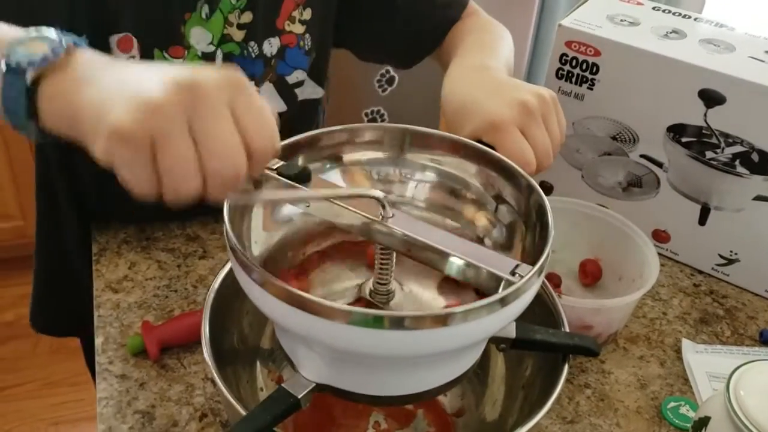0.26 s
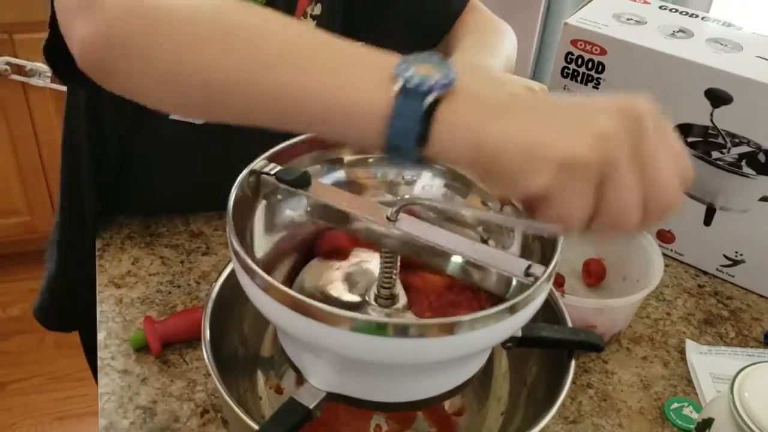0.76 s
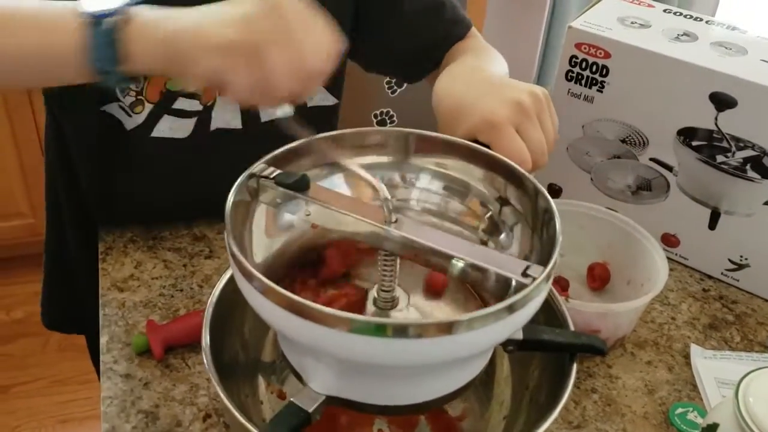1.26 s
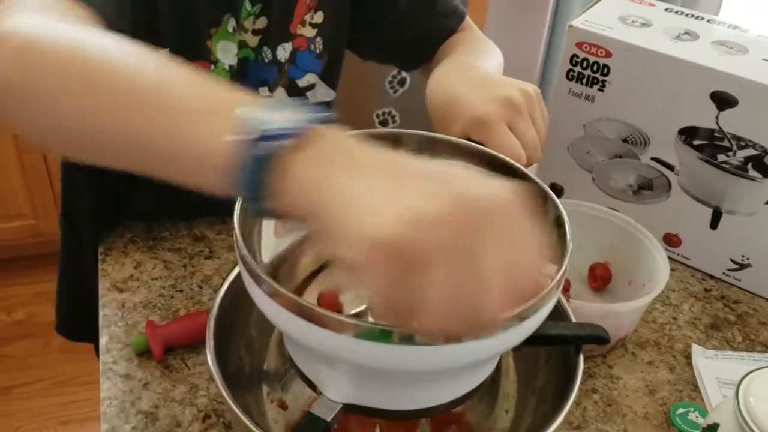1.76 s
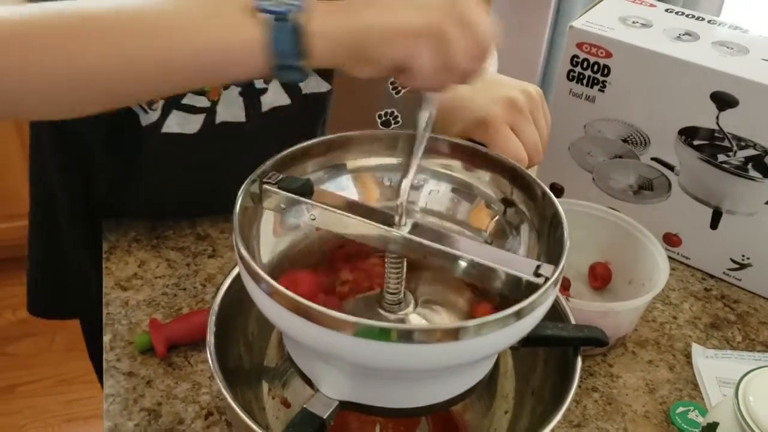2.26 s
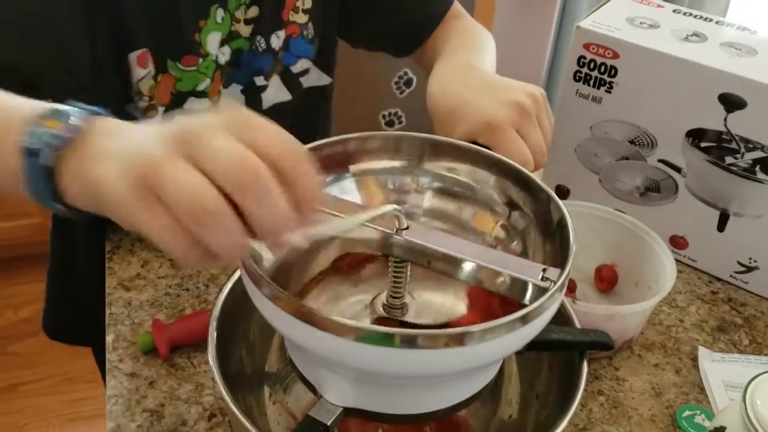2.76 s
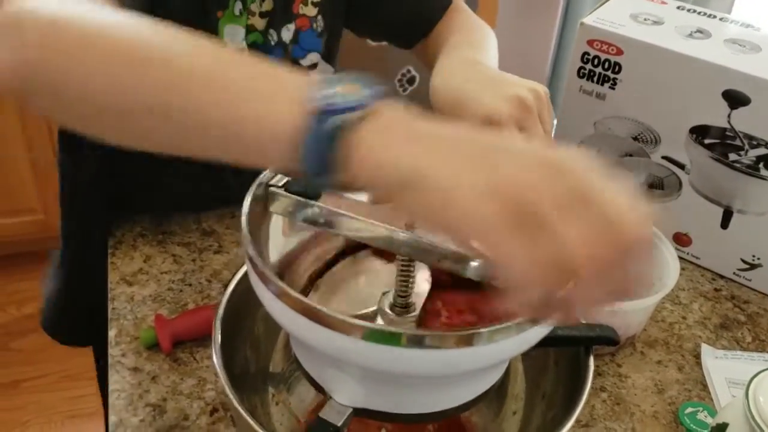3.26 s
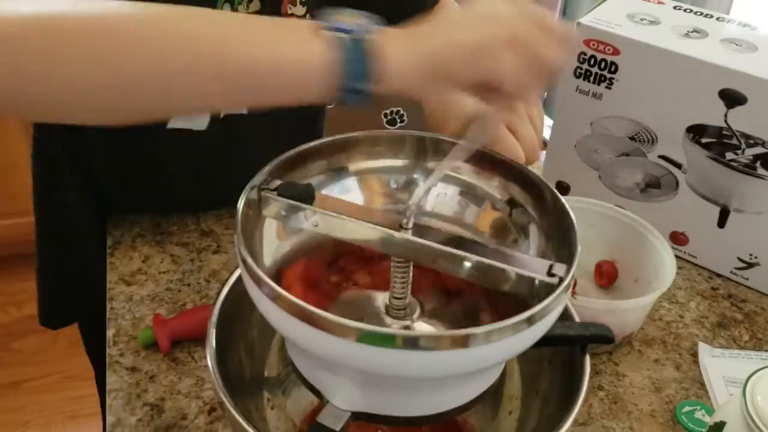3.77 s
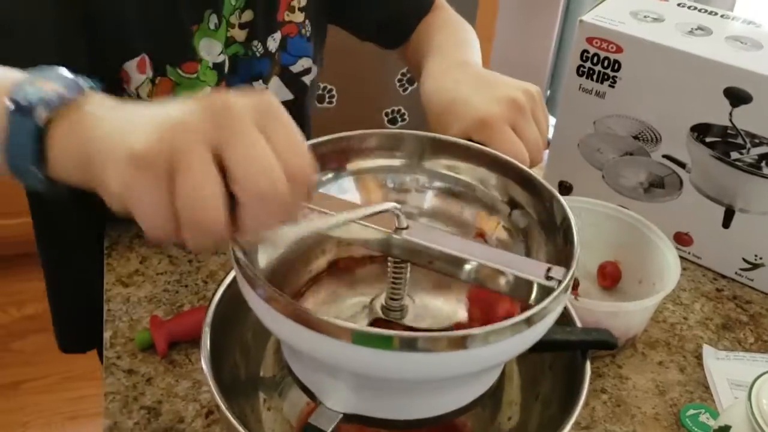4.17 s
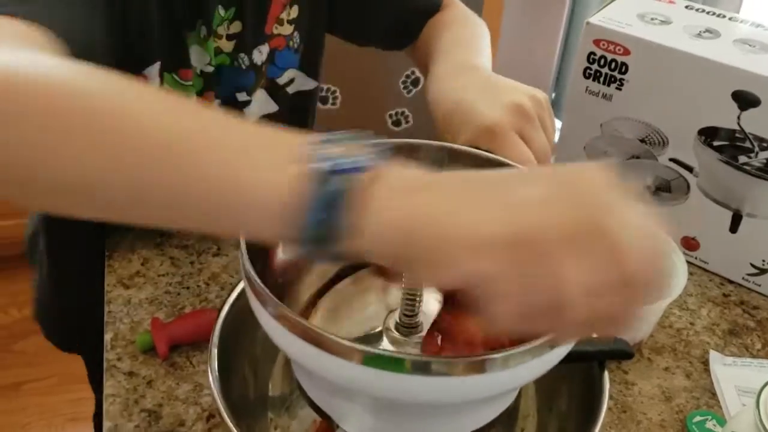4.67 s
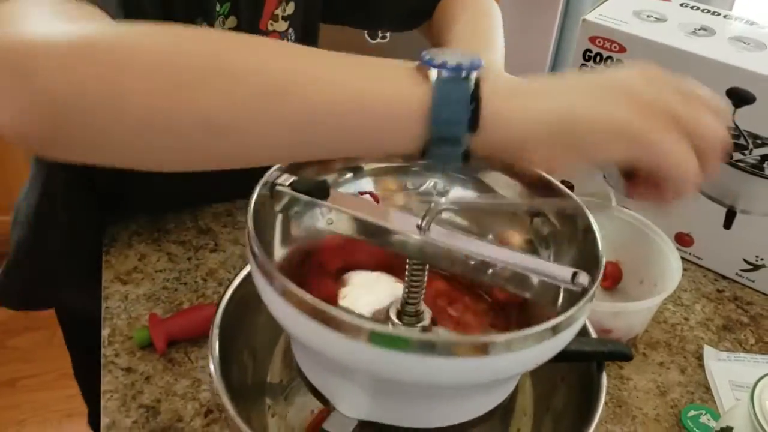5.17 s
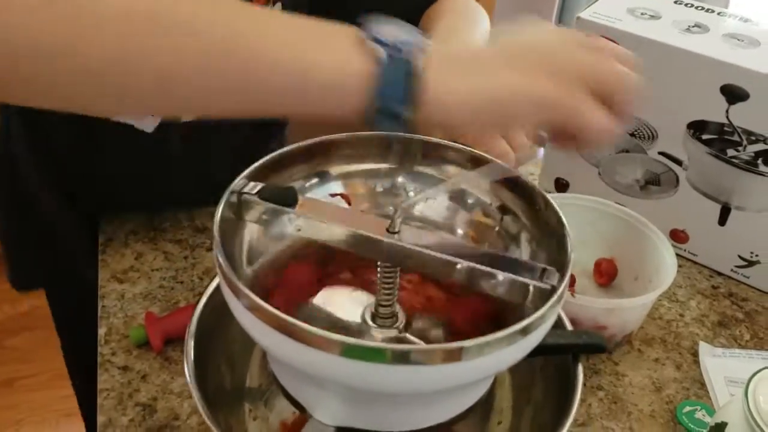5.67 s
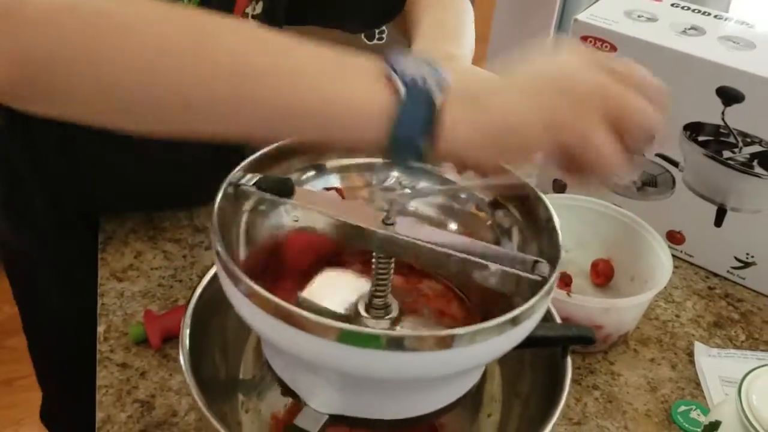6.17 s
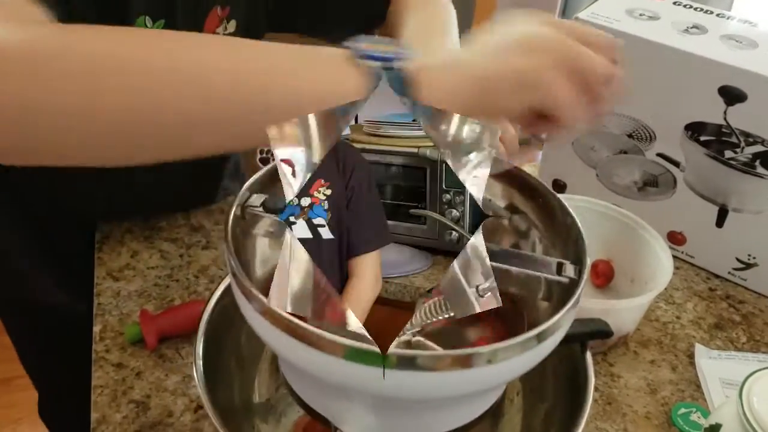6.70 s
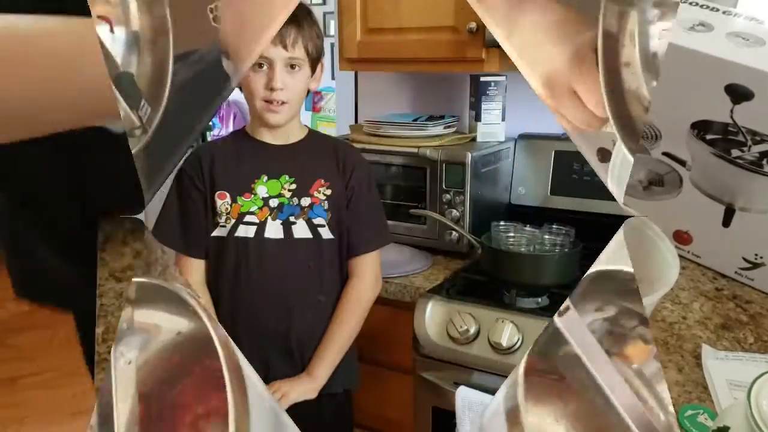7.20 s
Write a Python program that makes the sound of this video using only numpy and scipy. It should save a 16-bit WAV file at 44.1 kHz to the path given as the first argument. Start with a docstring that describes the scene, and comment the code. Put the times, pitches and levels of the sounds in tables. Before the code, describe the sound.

Close in a home kitchen, a hand-cranked steel mill turns on a mixing bowl. The blade scrapes grittily round a perforated disc with scattered metallic clicks and loose rattles. From about four seconds, clanks and hollow bowl knocks become denser and louder. Low room rumble and a faint high whine lie beneath. Just after seven seconds everything stops briefly, then a quieter room remains.

```python
"""In a kitchen, a hand-cranked steel food mill turns on a mixing bowl, close by.
The blade scrapes round a perforated disc (slip noise through mill and bowl modes) and snags with clicks
(snap, ringing modes, loose rattle). The mill knocks on the bowl (sagging sines, counter boom, noise).
Beneath lie coloured room tone, a swelling low rumble and a thin high whine with fast amplitude throb.
Near the end everything drops to a short silence, then a quieter room follows."""
import sys
import numpy as np
from scipy import signal
from scipy.fft import rfft, irfft
from scipy.io import wavfile
from scipy.ndimage import uniform_filter1d

SR = 44100
rng = np.random.default_rng(int(sys.argv[2]) if len(sys.argv) > 2 else 0)


def output_pcm(signal):
    """Save a mono or channel-first signal as 16-bit PCM at the path in sys.argv[1].

    Samples are clipped to [-1, 1] before scaling.
    """
    pcm = np.clip(np.atleast_2d(signal).T, -1, 1) * 32767
    wavfile.write(sys.argv[1], SR, np.round(pcm).astype(np.int16))


N = 328104

# modes of the mill: (frequency [Hz], width [Hz], relative level [dB])
MILL_MODES = [(1046, 95, -12), (1407, 130, -2), (1715, 40, -18), (2100, 88, -18), (2580, 133, -17),
              (3048, 81, -17.5), (4000, 105, -7), (4384, 94, -1.5), (5080, 440, -2), (5800, 470, -4.5),
              (6490, 100, 3), (7030, 700, 3), (11730, 860, -1.5), (14300, 600, -15.5)]
# modes of the bowl: (frequency [Hz], width [Hz], relative level [dB])
BOWL_MODES = [(128, 13, -4.5), (325, 200, -12), (455.3, 110, 0.5), (689.5, 26, 2.5)]
# bands of a snag, in the order mid, low, upper, top: (low edge [Hz], high edge [Hz])
SNAG_BANDS_HZ = [(1500, 4000), (600, 1500), (4000, 8000), (8000, 16500)]


def gain_of(db):
    """dB to amplitude gain."""
    return 10 ** (np.asarray(db) / 20)


def evened(x):
    """Scales to rms 1."""
    return x / np.sqrt(np.mean(x ** 2) + 1e-20)


def spectrum_at(points, hz):
    """Interpolates a spectrum on a log-frequency axis."""
    f, value = np.transpose(points)
    return np.interp(np.log(hz + 1), np.log(f + 1), value)


def curve(points):
    """Interpolates (time [s], value) points sample by sample."""
    s, value = np.transpose(points)
    return np.interp(np.arange(N) / SR, s, value)


def add(mix, s, sound):
    """Mixes a sound in at time s, cut at the end of the mix."""
    part = mix[:, round(s * SR):][:, :sound.shape[1]]
    part += sound[:, :part.shape[1]]


def band(x, lo_hz, hi_hz):
    """Butterworth band-pass."""
    sos = signal.butter(2, [lo_hz, hi_hz], "bandpass", fs=SR, output="sos")
    return signal.sosfilt(sos, x)


def ring(x, modes, dry):
    """Excites parallel two-pole resonators with x and adds a share of x unfiltered."""
    out = dry * x
    for hz, width_hz, db in modes:
        r = np.exp(-np.pi * width_hz / SR)
        b = [1 - r * r, 0, r * r - 1]
        a = [2, -4 * r * np.cos(2 * np.pi * hz / SR), 2 * r * r]
        out = out + 2 * gain_of(db) * signal.lfilter(b, a, x)
    return out


def stereo(spectrum, sources):
    """Blends two sources into left and right by likeness per frequency; channel mean has rms 1."""
    # (frequency [Hz], left-right likeness [0-1])
    likeness = [(60, 0.76), (180, 0.96), (550, 0.74), (1650, 0.035), (4970, 0.017), (15000, 0.071)]
    # (frequency [Hz], left over right [dB])
    tilt = [(60, 1), (150, 2.0), (380, 2), (950, 4), (2380, 3.5), (5980, 0), (15000, 3.5)]
    hz = np.fft.rfftfreq(N, 1 / SR)
    same = np.clip(spectrum_at(likeness, hz), -1, 1)
    lean = gain_of(spectrum_at(tilt, hz) / 2)
    a, b = rfft(sources)
    left = a * lean
    right = (same * a + np.sqrt(1 - same ** 2) * b) / lean
    out = irfft(np.array([left, right]) * gain_of(spectrum_at(spectrum, hz)), N)
    return out / np.sqrt(np.mean(out.mean(0) ** 2))


def grit(slips_per_s, spread_db, hiss, patchy_db):
    """Random tiny slips over a steady hiss, wandering in loudness by patches of pitch and time."""
    happens = rng.random(N) < slips_per_s / SR
    size = gain_of(spread_db * np.minimum(rng.exponential(1, N), 4)) * happens
    slips = signal.oaconvolve(size, np.exp(-np.arange(1500) / 110.0))[:N]
    noise = (hiss + evened(slips)) * rng.standard_normal((2, N))
    z = signal.stft(noise, nperseg=256, noverlap=192)[2]
    patches = uniform_filter1d(rng.standard_normal(z.shape[1:]), size=7, axis=0)  # across pitch
    patches = uniform_filter1d(patches, size=16, axis=1)  # across time
    swell = uniform_filter1d(rng.standard_normal(z.shape[2]), size=40)
    z = z * gain_of(patchy_db * evened(patches) + 2.95 * evened(swell))
    return signal.istft(z, nperseg=256, noverlap=192)[1][:, :N]


def quieter_room():
    """Steady coloured noise of the room after the silence."""
    # (frequency [Hz], relative level per Hz [dB])
    colour = [(30, -24), (60, 5.5), (160, -15), (550, -12), (1000, -15.5), (8000, -21.5), (15000, -22.5)]
    return gain_of(-52.5) * stereo(colour, rng.standard_normal((2, N)))


def room_tone():
    """Steady coloured noise beneath the mill."""
    # (frequency [Hz], relative level per Hz [dB])
    colour = [(20, -34.5), (40, -12), (50, -2), (75, 1), (125, -0.5), (300, -4.5), (480, -14.5),
              (650, -11.5), (1390, -19), (1950, -26.5), (2500, -15.5), (3500, -27), (7200, -25),
              (8400, -31), (12000, -25.5), (13500, -29.5), (15300, -12)]
    return gain_of(-52) * stereo(colour, rng.standard_normal((2, N)))


def rumble():
    """Low narrow-band noise, mostly common to both channels, that swells."""
    # (time [s], level [dB])
    swell = [(0, -60), (.7, -53.5), (2.2, -60.5), (3.2, -51.5), (4.6, -63), (5.2, -48.5), (5.8, -60.5),
             (7.2, -51)]
    noise = rng.standard_normal(N) + 0.17 * rng.standard_normal((2, N))
    low = band(band(noise, 44.2, 61.0), 40, 58.3)
    return evened(low) * gain_of(curve(swell))


def whine():
    """A high sine whose pitch wavers slightly and whose amplitude throbs fast."""
    # (time [s], level offset [dB])
    fade = [(0, -2), (5.0, -5), (6.4, -5.5), (7.1, -4)]
    whine_hz, throb_hz, base_db, throb_depth = 15122, 401, -62.5, 1.3
    t = np.arange(N) / SR
    waver = np.cumsum(evened(uniform_filter1d(rng.standard_normal(N), size=6000))) / SR
    tone = np.sqrt(2) * np.sin(2 * np.pi * (whine_hz * t + 1.3 * waver))
    throb = 1 + throb_depth * np.cos(2 * np.pi * (throb_hz * t + 1.4 * waver))
    return gain_of(base_db + curve(fade)) * tone * throb * gain_of([[2.5], [-3.5]])


def knocks():
    """Pushes rock the bowl at a sagging pitch; thumpier ones start faster and boom through the counter."""
    # mill on bowl: (time [s], strength before the bowl modes [dB], starting pitch [Hz], thump share [0-1])
    hits = [(1.088, -41, 375, 0.7), (1.359, -32, 284, 0.74), (2.761, -36.5, 438, 0.36),
            (3.427, -30.5, 486, 0.38), (3.64, -29.5, 519, 0.26), (4.115, -34, 480, 0.03),
            (4.14, -31.5, 509, 0.2), (4.387, -28.5, 297, 0.88), (4.609, -35.5, 525, 0.5),
            (4.779, -39.5, 483, 0.53), (4.804, -25.5, 502, 0.06), (5.059, -20.5, 93, 0.45),
            (5.081, -24.5, 99, 0), (5.216, -15.5, 590, 0.32), (5.238, -31.5, 415, 0.7),
            (5.253, -16.5, 182, 0.63), (5.4, -30.5, 466, 0.53), (5.758, -30, 176, 0.43),
            (5.944, -29, 470, 0.34), (6.005, -36.5, 296, 1), (6.28, -27.5, 290, 1), (6.374, -19, 624, 0.32),
            (6.658, -29.5, 524, 0.04), (7.023, -32, 600, 0.3), (7.089, -41.5, 126, 0.75)]
    # bowl on the counter: (frequency [Hz], relative level [dB], T60 [s])
    counter_modes = [(68, 4.5, 0.35), (98, -4.5, 0.28), (144, 0.5, 0.23), (201.6, 4, 0.18),
                     (312.6, 5, 0.13)]
    base_t60_s = 0.061  # at 500 Hz and -30 dB
    pitch_power = 0.56  # lower knocks last longer
    damping = 0.27  # harder knocks die sooner: dB of ring time per dB of blow
    out, t = np.zeros((2, N)), np.arange(9000) / SR
    boom = sum(gain_of(db - 60 * t / t60_s) * np.sin(2 * np.pi * hz * t) for hz, db, t60_s in counter_modes)
    noises = rng.standard_normal((len(hits), len(t)))
    for (s, db, hz, thump), noise in zip(hits, noises):
        rise_s = 0.0021 + 0.0011 * max(1 - thump, 0)
        rise = 1 - np.exp(-(t / rise_s) ** 2)
        t60_s = base_t60_s * (500 / hz) ** pitch_power * gain_of(-damping * (db + 30))
        fade = gain_of(-60 * t / t60_s)
        rock = np.sin(2 * np.pi * hz * t * (1 - 1.17 * t)) * fade
        shake = evened(band(noise, 74, 464)) * np.sqrt(fade)
        knock = rise * (rock + thump * (0.31 * boom + 0.5 * shake))
        add(out, s, gain_of(db) * knock * gain_of([[1.2], [-1.2]]))
    return ring(out, BOWL_MODES, 0.63)


def struck(spot_hz, chance):
    """Mill modes as one blow wakes them: strongest near the struck part, with random spread."""
    hz, width_hz, db = np.transpose(MILL_MODES)
    return np.transpose([hz, width_hz, db - 15 * abs(np.log2(hz / spot_hz)) + 2.5 * chance])


def clank(t, modes):
    """Sum of decaying mode sines, scaled to peak 1."""
    hz, width_hz, db = modes.T[:, :, None]
    out = (gain_of(db) * np.exp(-np.pi * width_hz * t) * np.sin(2 * np.pi * hz * t)).sum(0)
    return out / abs(out).max()


def band_levels(clank_db, spot_hz, edge_db):
    """Snag level per band: the clank fades away from the struck part, the edge fills the treble."""
    fall_db_per_oct, dull_db_per_oct = 8, 15.5  # the clank fades faster into the treble
    mid, low, upper = [abs(np.log2(np.sqrt(lo * hi) / spot_hz)) for lo, hi in SNAG_BANDS_HZ[:3]]  # octaves
    upper_gain = np.hypot(gain_of(clank_db - dull_db_per_oct * upper), gain_of(edge_db - 1.13))
    return (clank_db - fall_db_per_oct * mid, clank_db - 1.5 - fall_db_per_oct * low,
            20 * np.log10(upper_gain), edge_db + 0.4)


def clicks():
    """Blade snags: each a snap, a ringing clank and a loose rattle, the snap and clank later at right."""
    # (time [s], clank peak [dB], part struck hardest [Hz], bright-edge peak [dB], rattle re snap [dB])
    snags = [(0.1762, -25, 2600, -27.5, -12.5), (0.6589, -39.5, 2400, -45, -18),
             (0.7649, -26, 1360, -38, -17), (0.9013, -26.5, 1410, -52, -15),
             (1.0621, -27.5, 1350, -34.5, -8), (1.0929, -17.5, 1330, -46, -14),
             (1.208, -41, 5530, -45, -10.5), (1.2444, -27.5, 3540, -42, -13.5),
             (1.3156, -34.5, 5750, -39, -5), (1.388, -34.5, 1010, -50, -15), (1.429, -32, 1030, -50, -17),
             (1.5682, -35, 1050, -39, -17), (1.7218, -38, 5260, -44, -8.5), (1.7802, -21, 1470, -64, -14.5),
             (1.8821, -21.5, 1400, -29, -12), (1.8983, -18.5, 1470, -43, -14),
             (2.2239, -34, 1200, -55, -10), (2.3034, -27.5, 2360, -35.5, -16.5),
             (2.754, -24.5, 1370, -54, -7.5), (2.7636, -23, 2070, -33.5, -17.5),
             (2.9659, -21, 2830, -40, -21.5), (3.115, -25.5, 1220, -39, -14.5),
             (3.3957, -33, 2130, -28.5, -13), (3.412, -14.5, 4240, -20.5, -14.5),
             (3.43, -22, 2020, -30, -14.5), (3.6291, -34.5, 1250, -57, -2.5),
             (3.9566, -19.5, 2900, -33, -22), (4.0317, -33, 2590, -50, -21), (4.114, -26, 3640, -36, -7),
             (4.12, -13, 4600, -17, -17.5), (4.1408, -11.5, 1780, -44, -22),
             (4.1658, -21.5, 1710, -31, -21), (4.3169, -11, 3220, -25.5, -21), (4.348, -35, 2710, -31, -19),
             (4.3965, -27, 2670, -36, -15.5), (4.4766, -28, 1530, -47, -11.5),
             (4.7877, -18.5, 1300, -24, -10.5), (4.798, -15, 1120, -46, -14),
             (4.8109, -5.5, 1370, -14.5, -16), (4.824, -17, 1040, -32.5, -20), (5.018, -29, 3900, -42, -15),
             (5.036, -40, 2480, -37.5, -7), (5.0505, -30, 1880, -49.5, 1), (5.163, -26, 1090, -53, -38),
             (5.217, -16.5, 1100, -27, -17), (5.3196, -24, 1630, -26, -12), (5.3273, -18, 970, -37, -20),
             (5.348, -26, 1040, -50, -30), (5.3886, -20, 4550, -23, -12.5),
             (5.4013, -9.5, 1410, -27, -14.5), (5.4184, -20.5, 902, -38, -12),
             (5.4306, -19.5, 1140, -47, -34), (5.5518, -25.5, 5900, -33, -32),
             (5.5583, -29.5, 2620, -30, -15.5), (5.614, -27, 902, -46, -6.5),
             (5.6252, -9.5, 1070, -36, -16), (5.6476, -23.5, 1080, -24, -22),
             (5.8644, -25, 2820, -33, -17.5), (5.915, -22, 1110, -53, -16),
             (5.9455, -10.5, 1250, -19.5, -15), (6.0328, -29.5, 2180, -32, -15),
             (6.0498, -23, 1090, -47, -21), (6.1308, -34, 3830, -33, -10), (6.17, -34, 1010, -25.5, -23),
             (6.2577, -26, 3100, -45.5, -7), (6.27, -33.5, 4300, -42, -17), (6.2988, -30, 2570, -43, -20),
             (6.3737, -18.5, 1900, -17, -11.5), (6.3868, -13, 1080, -16.5, -16.5),
             (6.537, -7.5, 4300, -16.5, -17), (6.6626, -37, 974, -36.5, -10.5), (6.716, -31, 4300, -48, -7),
             (6.7444, -30.5, 3800, -47, -5), (6.788, -31.5, 4400, -36.5, -10), (6.814, -38, 4400, -38, -10),
             (6.875, -35, 6000, -44, -7.5), (7.0109, -23, 1300, -31, -8.5),
             (7.0304, -21.5, 1020, -22.5, -17.5), (7.1034, -39, 2330, -37, -6)]
    # one value per band: snap T60 [s]
    snap_t60_s = [0.0061, 0.017, 0.0098, 0.01]
    # one value per band: rattle T60 [s]
    rattle_t60_s = [0.16, 0.12, 0.16, 0.12]
    # one value per band: delay of the right channel [samples]
    right_lag_samples = [3, 1, 9, 9]
    # one value per band: rattle mixed across from the other channel [ratio]
    rattle_cross = [0.012, 0.29, 0.28, 0.011]
    # one value per band: left over right [dB]
    left_over_right_db = [8, 4.5, 2, 5.5]
    out, t = np.zeros((2, N)), np.arange(6000) / SR
    noises = rng.standard_normal((len(snags), 3, len(t)))
    rise = 1 - np.exp(-(t / 0.0007) ** 2)  # the blade gives way over a millisecond or two
    for (s, clank_db, spot_hz, edge_db, loose_db), (snap, left, right) in zip(snags, noises):
        modes = struck(spot_hz, snap[-len(MILL_MODES):])
        blow = clank(t, modes)
        bounces = gain_of(1.53 * evened(uniform_filter1d(snap[::-1], size=130)))  # loose parts touch again
        loose = ring(bounces * np.array([left, right]), modes, 0.22)
        sound = np.zeros((2, len(t)))
        bands = zip(SNAG_BANDS_HZ, band_levels(clank_db, spot_hz, edge_db), snap_t60_s,
                    rattle_t60_s, right_lag_samples, rattle_cross, left_over_right_db)
        for edges_hz, db, snap_s, rattle_s, lag, cross, lean_db in bands:
            head = band(rise * (1.21 * snap * gain_of(-60 * t / snap_s) + blow), *edges_hz)
            head = np.array([head, np.roll(head, shift=lag)]) / abs(head).max()
            tail = evened(band(loose + cross * loose[::-1], *edges_hz)) * rise
            kitchen = gain_of(-12.5 - 60 * t / 0.39)  # the kitchen holds the last of it
            fade = gain_of(-60 * t / rattle_s) + kitchen
            sides = gain_of([[db + lean_db / 2], [db - lean_db / 2]])
            sound += sides * (head + gain_of(loose_db) * tail * fade)
        add(out, s, sound)
    return out


def scrape():
    """Blade dragging over the holes; pressure makes it louder and fuller and sets the bowl droning."""
    # blade pressure: (time [s], scrape level in 0.8-5 kHz [dB])
    pressure = [(0.0, -68), (0.23, -60), (0.55, -65.5), (1.24, -59.5), (1.55, -67), (1.88, -58.5),
                (2.06, -69.5), (2.63, -64.5), (2.85, -57), (3.28, -60), (4.24, -56), (4.81, -58.5),
                (5.14, -49), (5.22, -51.5), (5.69, -54.5), (6.18, -50.5), (6.75, -55), (7.05, -56.5)]
    # scrape colour: (frequency [Hz], relative level per Hz [dB])
    colour = [(500, -46), (900, 14), (1700, 9.5), (3560, 9.5), (7200, -2.5), (8600, -6.5), (12000, -4.5),
              (13200, 1), (15500, -5.5)]
    middling_db = -57
    treble_lift_db, drone_db = 3.5, -51  # at middling pressure
    treble_follow, drone_follow = 0.4, 0.98  # shares of the pressure swing
    rub_db = curve(pressure)
    swing_db = rub_db - middling_db
    slips = grit(slips_per_s=250, spread_db=4, hiss=2.9, patchy_db=3.27)
    rub = stereo(colour, ring(slips, MILL_MODES, 1.0))
    rub = rub / np.std(band(rub.mean(0), 800, 5000))
    treble = band(rub, 5600, 21000)
    rub = rub + (gain_of(treble_lift_db + (treble_follow - 1) * swing_db) - 1) * treble
    bowl_slips = grit(slips_per_s=41, spread_db=1.5, hiss=6.0, patchy_db=1.5)
    hum = band(ring(bowl_slips, BOWL_MODES, 0.68), 130, 610)
    drone = evened(np.array([1.41 * hum[0], 0.84 * hum[0] + 0.47 * hum[1]]))
    return gain_of(rub_db) * rub + gain_of(drone_db + drone_follow * swing_db) * drone


def scene():
    """Mill and room, a short silence, then the quieter room."""
    silence_from_s, silence_to_s = 7.163, 7.289
    t = np.arange(N) / SR
    before = np.clip((silence_from_s + 0.0096 - t) / 0.019, 0, 1)
    after = np.clip((t - silence_to_s) / 0.0099, 0, 1)
    background = room_tone() + rumble() + whine()
    mill = knocks() + clicks() + scrape()
    return before * (background + mill) + after * quieter_room()


def record(dry):
    """Limits the band with a linear-phase low-pass at 15.8 kHz."""
    lowpass = signal.firwin(255, 15800, window=("kaiser", 7), fs=SR)
    return signal.oaconvolve(dry, lowpass[None], "same")


dry = scene()
out = record(dry)
output_pcm(out)
```